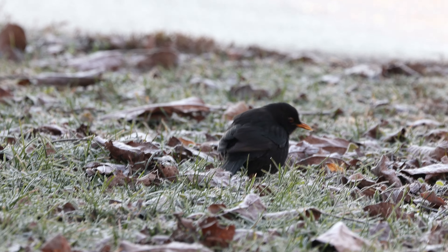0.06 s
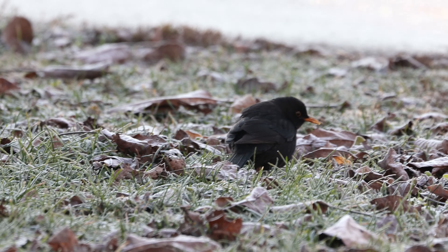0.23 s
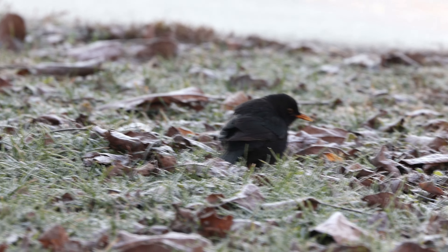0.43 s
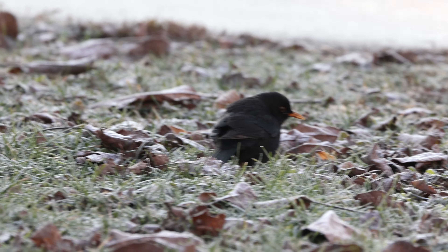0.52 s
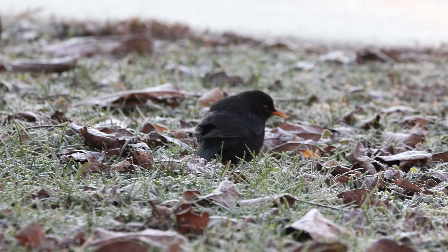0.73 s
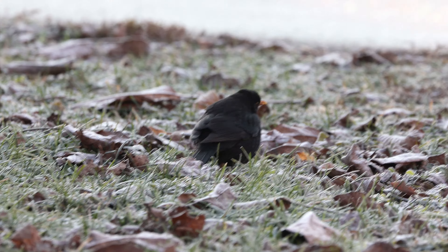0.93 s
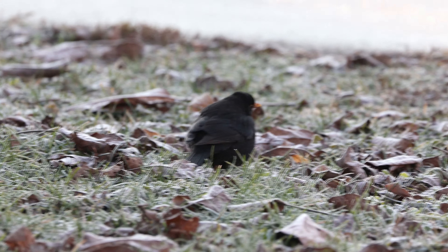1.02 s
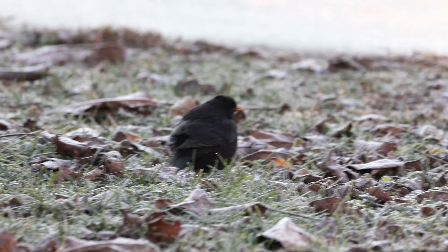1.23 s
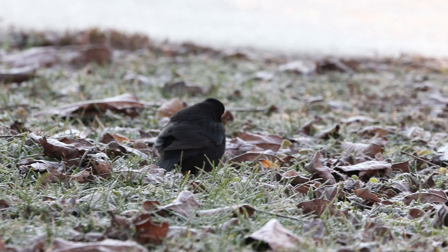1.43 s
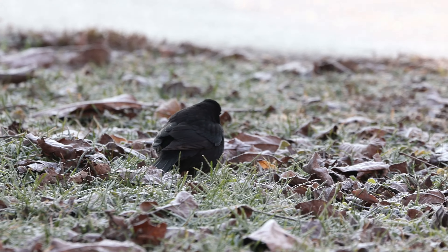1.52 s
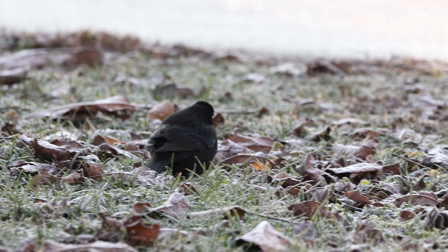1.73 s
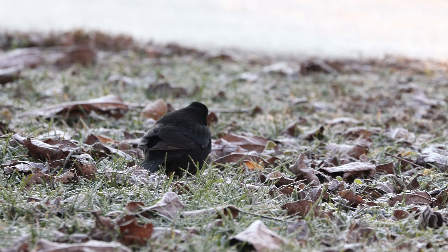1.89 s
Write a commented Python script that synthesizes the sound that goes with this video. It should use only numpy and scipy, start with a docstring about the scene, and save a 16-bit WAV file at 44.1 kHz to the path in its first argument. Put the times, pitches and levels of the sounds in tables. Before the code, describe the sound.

A blackbird gives a quick run of short, harsh, high calls, then one more after a pause, echoing slightly over a lawn. Close to the microphone a small motor faintly whirs and ticks, and a low handling rumble swells near the end.

```python
"""Harsh alarm calls of a blackbird ring out over a frosty lawn: each is a frequency-modulated whistle that
arches up and drops, wrapped in a rasp of noise and reflected by the garden. A smaller bird adds thin
upward chips. Close by, a small motor, probably focusing a lens, whirs and ticks as its steps excite the
resonances of its housing. Handling rumble swells near the end."""
import sys
import numpy as np
from scipy import signal
from scipy.fft import rfft, irfft
from scipy.io import wavfile

SR = 44100
rng = np.random.default_rng(int(sys.argv[2]) if len(sys.argv) > 2 else 0)


def wav_out(sig):
    """Save sig, one row per channel (or a flat mono array), as 16-bit PCM at SR to the path in sys.argv[1]."""
    wavfile.write(sys.argv[1], SR, np.round(np.clip(np.atleast_2d(sig).T, -1, 1) * 32767).astype(np.int16))


N = 85995
T = np.arange(N) / SR


def from_db(db):
    """Amplitude ratio of a level: a factor of ten for every 20 dB."""
    return 10 ** (np.asarray(db) / 20)


def unit_power(x):
    """Normalisation to a mean square of one."""
    return x / np.sqrt(np.mean(x ** 2) + 1e-20)


def in_time(rows):
    """Linear interpolation in time: one curve for each column after the first, which holds seconds."""
    times, *columns = np.transpose(rows)
    return [np.interp(T, times, column) for column in columns]


def noise(spectrum):
    """Spectral shaping: white noise weighted by a curve of level against frequency, at unit power."""
    hz, db = np.transpose(spectrum)
    bins_hz = np.maximum(np.arange(N // 2 + 1) * SR / N, 1)
    gain = from_db(np.interp(np.log(bins_hz), np.log(hz), db))
    return unit_power(irfft(rfft(rng.standard_normal(N)) * gain, N))


def flutter(rate_hz):
    """Random modulation: noise low-passed at the given rate, at unit power."""
    lowpass = signal.butter(2, rate_hz, fs=SR, output="sos")
    return unit_power(signal.sosfilt(lowpass, rng.standard_normal(N)))


def gate(start, end, attack_s, release_s):
    """Amplitude envelope that opens and closes with smooth edges."""
    return (1 + np.tanh((T - start) / attack_s)) * (1 - np.tanh((T - end) / release_s)) / 4


def decay(age, t60):
    """Exponential damping: the level falls 60 dB in t60 seconds."""
    return np.exp(-np.log(1000) * age / t60)


def tone(hz):
    """Sinusoid of unit power whose phase is the integral of its frequency."""
    return np.sqrt(2) * np.sin(2 * np.pi * (np.cumsum(hz) / SR + rng.random()))


def microphone_hiss():
    """Self-noise: a part common to both channels plus a side part in opposite phase."""
    # Each row: frequency in Hz, relative level in dB.
    spectrum = [(1000, -13), (4800, -5), (6500, 1), (9000, 2), (15000, 0)]
    side = from_db(-1.5) * noise(spectrum) * np.array([[1], [-1]])
    return from_db(-79.5) * (noise(spectrum) + side)


def distant_rumble():
    """Steady ambient noise with its power concentrated at low frequencies."""
    # Each row: frequency in Hz, relative level in dB.
    spectrum = [(15, -7.5), (35, -12), (68, -5), (110, -12), (200, -14.5), (400, -22), (900, -32.5),
                (2000, -48), (4500, -47)]
    return from_db(-73) * noise(spectrum)


def handling_rumble():
    """Structure-borne sound: hands on the camera make a low noise that swells near the end."""
    # Each row: time in seconds, level in dB.
    envelope = [(0, -68.5), (.43, -70.5), (.65, -78), (.76, -86), (.92, -88), (1.15, -67.5), (1.38, -66.5),
                (1.48, -50.5), (1.61, -44), (1.7, -54), (1.83, -62), (1.95, -58)]
    # Each row: frequency in Hz, relative level in dB.
    spectrum = [(15, 3), (35, -3.5), (58, 2), (85, -4), (130, -14), (220, -24.5), (500, -63.5)]
    return from_db(in_time(envelope)[0]) * noise(spectrum)


def lingering_echo():
    """Reverberation outlasts its source: a band of noise left by an earlier call fades away."""
    # Each row: time in seconds, level in dB.
    envelope = [(0, -73.5), (.18, -71.5), (.3, -100.5)]
    # Each row: frequency in Hz, relative level in dB.
    spectrum = [(2000, -48), (2800, -15.5), (3700, 11.5), (4200, 0), (4800, -13), (7000, -34.5)]
    return from_db(in_time(envelope)[0]) * noise(spectrum)


def motor_whir():
    """Noise and tone of a running motor: a whir with resonant peaks and a faint, sinking whine."""
    # Each row: time in seconds, relative level of the whir in dB.
    envelope = [(0, -60), (.07, -72), (.2, -62.5), (.5, -62), (.6, -55.5), (.69, -66.5), (.8, -62),
                (.92, -68), (1.13, -59), (1.22, -67.5), (1.4, -57), (1.62, -59), (1.87, -62.5), (1.95, -73)]
    # Each row: frequency in Hz, relative level of the whir in dB.
    spectrum = [(200, -23.5), (400, -12.5), (600, -4.5), (850, -6), (1020, -1), (1130, -6.5), (1380, 1),
                (1520, 3.5), (1700, -9), (2150, -17), (2600, -12.5), (3300, -50.5), (5000, -40)]
    # Each row: time in seconds, frequency in Hz, level in dB.
    whine = [(1.2, 1990, -99), (1.25, 2030, -76.5), (1.36, 1863, -68), (1.6, 1916, -71), (1.8, 1842, -78),
             (1.87, 1860, -75.5), (1.9, 1860, -110)]
    whir_db, = in_time(envelope)
    whine_hz, whine_db = in_time(whine)
    return from_db(whir_db - 1) * noise(spectrum) + from_db(whine_db) * tone(whine_hz)


def motor_ticks():
    """Impulse excitation: each step of the motor rattles the housing and rings two damped modes."""
    # Each row: start in seconds, then relative levels in dB of the rattle, the low mode and the high mode.
    steps = [(0.095, -52.5, -58, -73), (0.249, -61, -57, -51.5), (0.31, -53, -52, -59),
             (0.35, -51, -62, -53.5), (0.397, -56.5, -60, -60), (0.434, -54, -51.5, -53),
             (0.457, -45, -58, -51.5), (0.561, -57, -50, -60), (0.583, -42, -77, -42.5),
             (0.6, -45.5, -49.5, -46), (0.822, -53, -53, -53), (0.904, -46.5, -55.5, -84),
             (0.956, -46, -63, -60), (0.987, -48.5, -77, -51), (1.002, -60, -70, -49.5),
             (1.056, -49, -54.5, -55), (1.117, -59, -57, -48), (1.133, -49.5, -49.5, -72),
             (1.159, -57.5, -58, -52.5), (1.244, -51, -60, -59), (1.309, -59.5, -66, -61),
             (1.333, -41.5, -50, -60), (1.351, -50.5, -46.5, -46.5), (1.393, -58, -49.5, -60.5),
             (1.43, -35.5, -48.5, -67), (1.514, -38, -50.5, -62), (1.551, -50, -52, -53),
             (1.586, -41.5, -58, -51), (1.629, -45, -50.5, -47.5), (1.718, -59, -52.5, -47.5),
             (1.758, -51.5, -53, -72), (1.795, -51.5, -54, -47), (1.835, -48, -53.5, -61),
             (1.871, -52.5, -54, -52)]
    # Each row: frequency in Hz, relative level in dB.
    rattle_spectrum = [(250, -25.5), (520, -2.5), (700, 1.5), (900, -6), (1200, -3.5), (1400, 1.5),
                       (1650, -4), (2100, -9), (2600, -4.5), (3800, -14.5), (5000, -33.5), (9000, -55.5)]
    # Each row: frequency in Hz, time to fall 60 dB in seconds, gain in dB.
    modes = [(1025, .068, 4.05), (1495, .063, .2)]
    rise_s, rattle_decay_s, rattle_gain_db, detuning = .0009, .008, -11, .022
    out, rattle = np.zeros(N), noise(rattle_spectrum)
    for start, rattle_db, *mode_levels in steps:
        age = np.maximum(T - start, 0)
        onset = 1 - np.exp(-age / rise_s)
        out += from_db(rattle_db + rattle_gain_db) * onset * np.exp(-age / rattle_decay_s) * rattle
        for (hz, t60, gain_db), mode_db in zip(modes, mode_levels):
            ring = np.sin(2 * np.pi * hz * (1 + detuning * rng.standard_normal()) * age)
            out += from_db(mode_db + gain_db) * onset * decay(age, t60) * ring
    return out


def diffuse_response(db, t60):
    """Impulse response of a diffuse field: noise that builds after a short delay and dies exponentially."""
    delay_s, build_s = .012, .005
    age = np.maximum(T - delay_s, 0)
    envelope = decay(age, t60) * (1 - np.exp(-age / build_s))
    return from_db(db) * unit_power(envelope * rng.standard_normal(N)) / np.sqrt(N)


def garden(direct):
    """Reflection and scattering: the direct sound gains near echoes, scatter from shrubs and a dull tail."""
    # Each row: delay in seconds, level relative to the direct sound in dB.
    echoes = [(.0125, -13), (.021, -14), (.033, -14.5)]
    tail_cutoff_hz, blur_hz = 3600, 170
    near = sum(from_db(db) * np.interp(T - delay, T, direct) for delay, db in echoes)
    shrubs = diffuse_response(db=-6, t60=.22)
    lowpass = signal.butter(6, tail_cutoff_hz, fs=SR, output="sos")
    tail = signal.sosfilt(lowpass, diffuse_response(db=-11, t60=.41))
    # A random frequency shift smears the pitch of the reverberation.
    blur_phase = 2 * np.pi * np.cumsum(blur_hz * flutter(rate_hz=311)) / SR
    blurred = np.real(signal.hilbert(direct) * np.exp(1j * blur_phase))
    return direct + near + signal.fftconvolve(blurred, shrubs + tail)[:N]


def small_bird():
    """Linear chirps: each chip is a pure tone swept rapidly upward."""
    # Each row: centre and half length in seconds, centre frequency in Hz, sweep in Hz/s, level in dB.
    chips = [(.846, .009, 4200, 36000, -54), (1.683, .007, 4500, 95000, -70)]
    out = np.zeros(N)
    for centre, half, centre_hz, sweep, db in chips:
        hz = centre_hz + sweep * np.clip(T - centre, -2 * half, 2 * half)
        envelope = gate(centre - half, centre + half, attack_s=.0025, release_s=.0025)
        out += from_db(db) * envelope * tone(hz)
    return out


def blackbird_squeaks():
    """Random frequency modulation roughens the thin tones that lead into the calls."""
    # Each row: centre and half length in seconds, frequency and its rms deviation in Hz, level in dB.
    squeaks = [(0.193, 0.0051, 5380, 81.4, -67), (0.218, 0.017, 3820, 254, -58),
               (0.226, 0.016, 6470, 229.8, -59), (0.246, 0.05, 5080, 256, -64),
               (0.34, 0.032, 6540, 201, -72.5), (0.496, 0.061, 7310, 333.3, -79.5),
               (0.725, 0.0086, 3700, 70, -49), (0.749, 0.024, 5420, 204, -71),
               (1.38, 0.026, 6510, 267, -63), (1.371, 0.024, 3590, 235, -58), (1.371, 0.01, 4800, 354, -55)]
    out = np.zeros(N)
    for centre, half, hz, rough_hz, db in squeaks:
        envelope = gate(centre - half, centre + half, attack_s=.0025, release_s=.0027)
        out += from_db(db) * envelope * tone(hz + rough_hz * flutter(rate_hz=870))
    return out


def blackbird_calls():
    """Modulation by noise widens a tone: each rasping whistle climbs, then breaks into a falling band."""
    # Each row: crest time in seconds, crest frequency in Hz, rise and fall in seconds, level in dB,
    # rms frequency deviation in Hz, level of the rasp relative to the whistle in dB.
    calls = [(0.246, 3973, 0.01, 0.039, -43, 127, -8), (.342, 3713, .007, 0.0075, -38.5, 69.8, -6),
             (.376, 3710, .016, .024, -36, 110.8, -8.5), (.434, 4073, 0.023, .020, -39, 145, -23),
             (0.545, 3959, 0.029, 0.0283, -40.5, 59.5, -9.5), (0.757, 3787, 0.023, .021, -36, 37, -15),
             (1.399, 3996, .015, .023, -37, 154.3, -13.5)]
    # Each row: frequency in Hz, relative level in dB.
    rasp_spectrum = [(1800, -30), (2300, -17.5), (2700, -10.5), (3600, 3.5), (4400, -3.5), (5200, -5),
                     (5900, -18), (6800, -32), (8000, -42.5), (11000, -50.5)]
    climb_hz_per_s, drop_hz_per_fall, rasp_lead_s = 9200, 737, .013
    half_band_hz, break_s, band_power_share = 330, .012, .7
    out, rasp, wobble = np.zeros(N), noise(rasp_spectrum), flutter(rate_hz=585)
    # Multiplying a tone by this low-passed noise spreads it into a band.
    shake = noise([(1, 0), (half_band_hz, 0), (2 * half_band_hz, -12),
                   (4 * half_band_hz, -36), (8 * half_band_hz, -100)])
    for crest, crest_hz, rise, fall, db, rough_hz, rasp_db in calls:
        climb_left_hz = climb_hz_per_s * np.clip(crest - T, 0, 2 * rise)
        drop_hz = drop_hz_per_fall * np.clip((T - crest) / fall, 0, 1.4)
        hz = crest_hz - climb_left_hz - drop_hz
        broken = band_power_share * np.clip((T - crest) / break_s, 0, 1)
        whistle = np.sqrt(1 - broken) * tone(hz + rough_hz * wobble)
        band = np.sqrt(broken) * shake * tone(hz + half_band_hz * wobble / 2)
        start, end = crest - rise, crest + fall
        out += from_db(db) * gate(start, end, attack_s=.003, release_s=.009) * (whistle + band)
        out += from_db(db + rasp_db) * gate(start - rasp_lead_s, end, attack_s=.011, release_s=.013) * rasp
    return out


def scene():
    """Superposition: all but the hiss is centred, and the chips are less reverberant than the calls."""
    chip_reflected_share = .6
    chips = small_bird()
    blackbird = blackbird_calls() + blackbird_squeaks()
    birds = garden(blackbird + chip_reflected_share * chips) + (1 - chip_reflected_share) * chips
    motor = motor_ticks() + motor_whir()
    background = distant_rumble() + handling_rumble() + lingering_echo() + microphone_hiss()
    return birds + motor + background


def record(dry):
    """Band limiting: a steep elliptic low-pass filter removes the highest treble."""
    cutoff_hz = 15700
    return signal.sosfilt(signal.ellip(12, .1, 70, cutoff_hz, fs=SR, output="sos"), dry)


dry = scene()
out = record(dry)
wav_out(out)
```